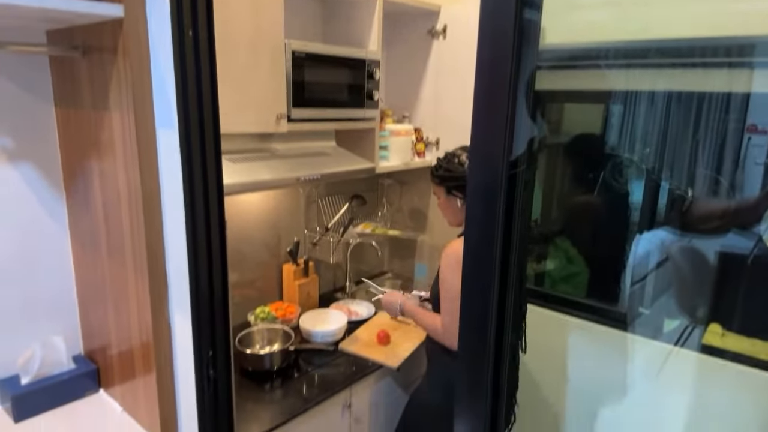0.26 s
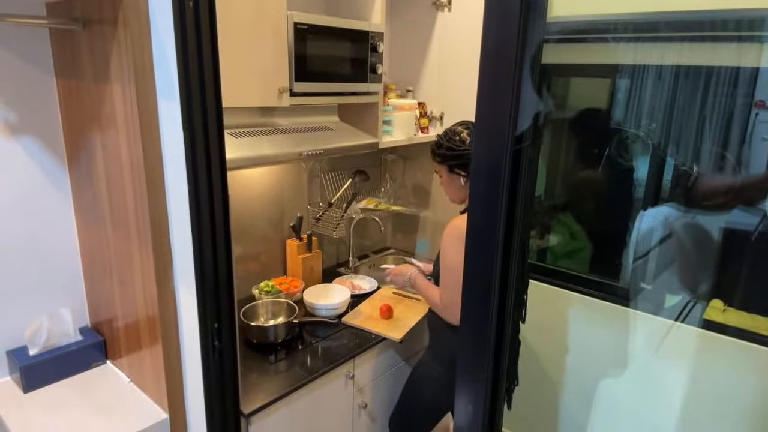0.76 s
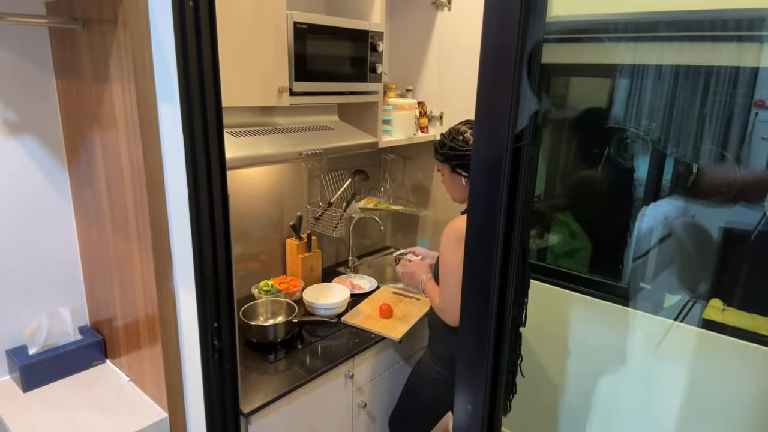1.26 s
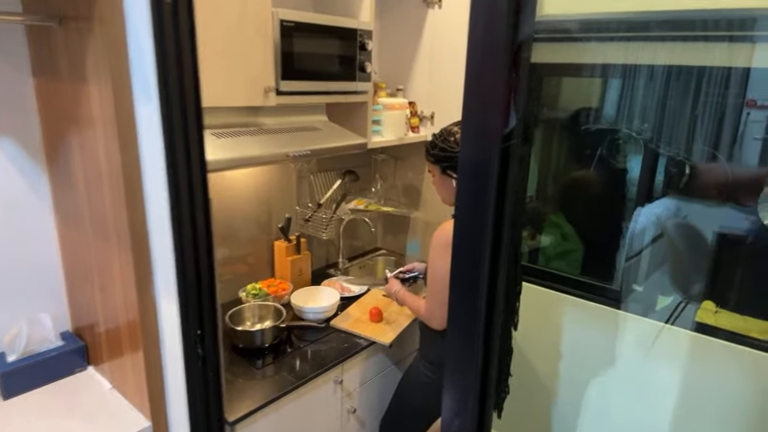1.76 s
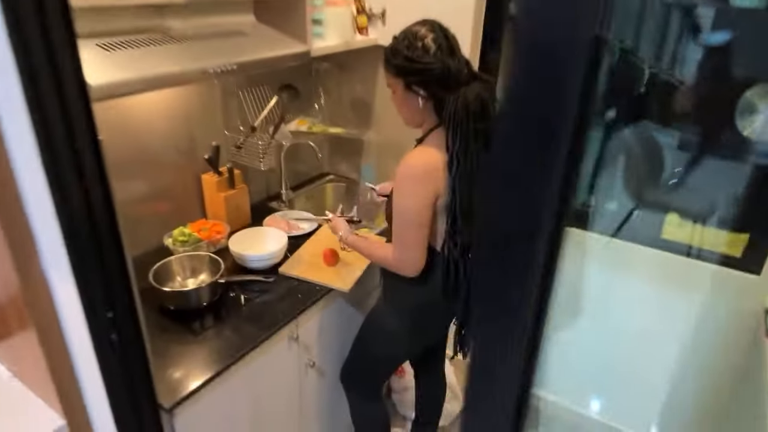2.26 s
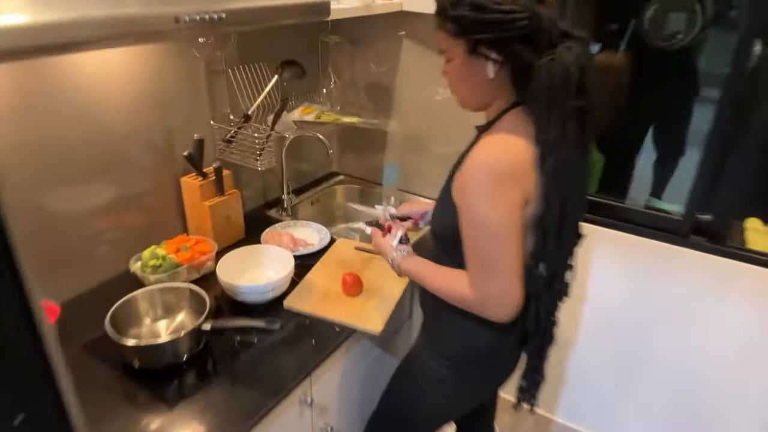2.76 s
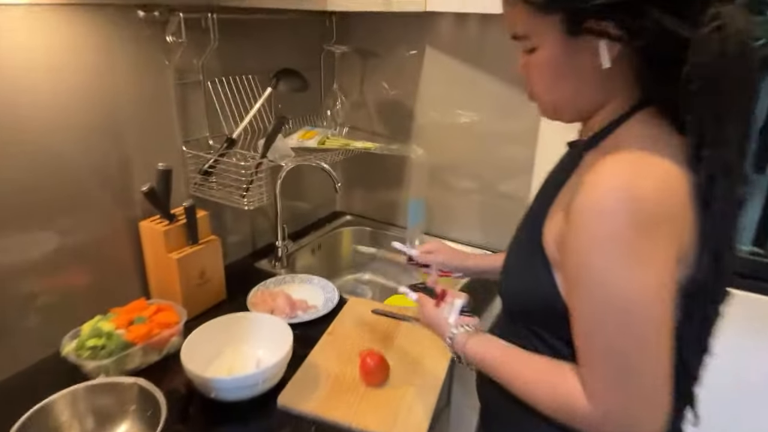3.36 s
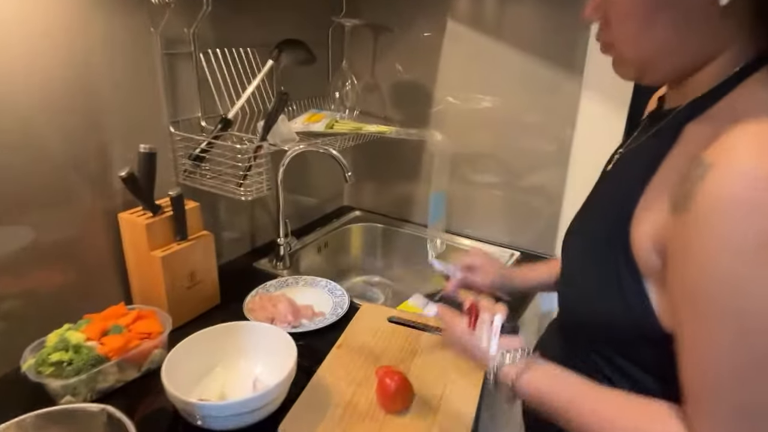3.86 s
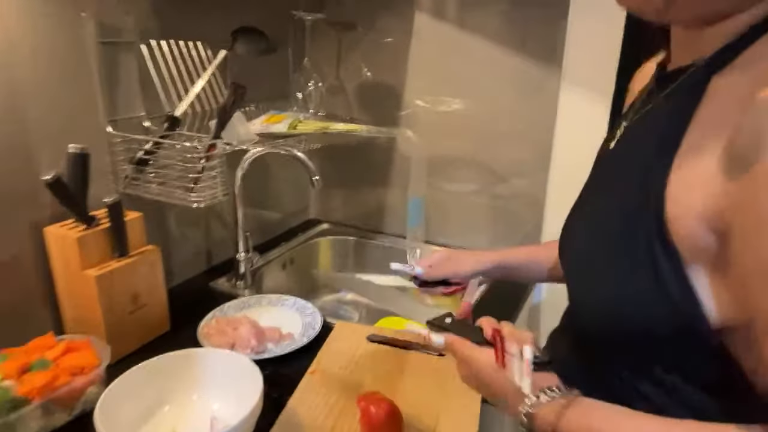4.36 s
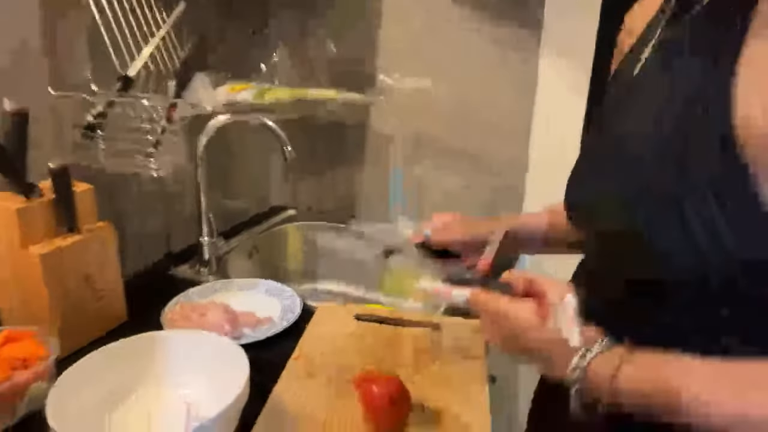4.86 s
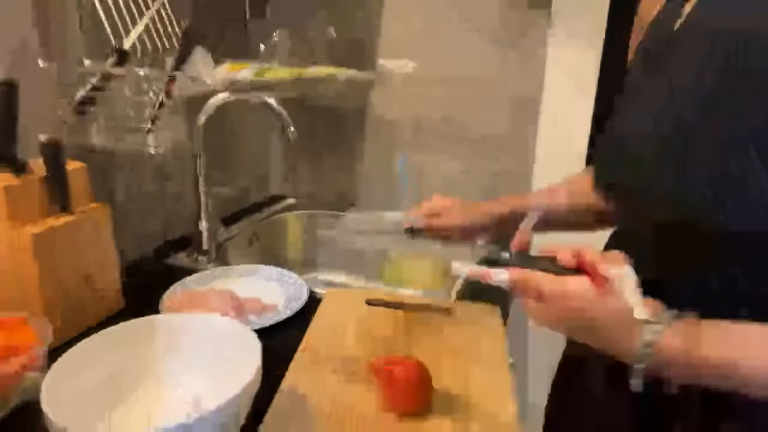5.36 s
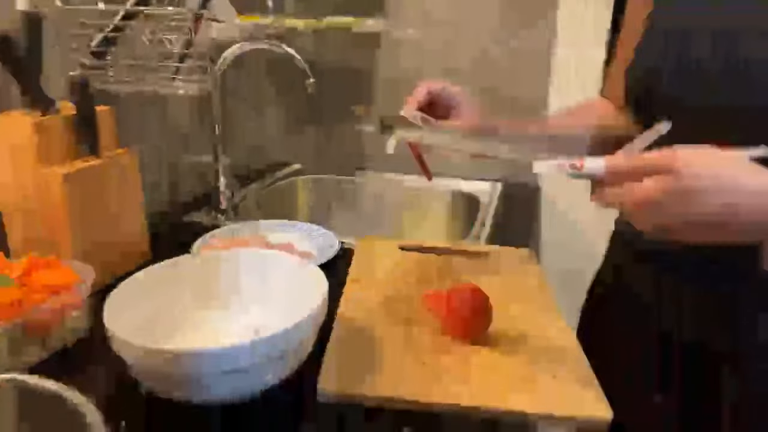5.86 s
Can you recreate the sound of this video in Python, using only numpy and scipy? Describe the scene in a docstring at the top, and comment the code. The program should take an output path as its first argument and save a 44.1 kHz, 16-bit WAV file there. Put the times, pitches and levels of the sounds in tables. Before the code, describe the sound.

Bright, gritty knife scrapes, mostly creeping and then tearing quickly, ring lightly in a small echoing kitchen. A low airy fan hums behind. After two early strokes there is a pause with small steel ticks, then irregular pulls that get louder, drier and closer. Around the middle the whole sound dips out three times. Near the end come strong scrapes, a hard plastic rattle, finger rustle and a last squeaky pull.

```python
"""Sharpening a kitchen knife

A steel knife is drawn again and again through a handheld sharpener in a small hard-walled kitchen.
Many pulls start with a click; the edge mostly creeps, then speeds up and tears over the abrasive.
Scrapes are random grain hits ringing through blade and holder; squeaks are gliding tones, and taps
and knocks are short noise bursts. Fingers rustle, random echoes make the room, and a fan of noise
and wavering tones hums behind. In the middle the whole sound fades down three times and returns.
"""
import sys
import numpy as np
from scipy import signal
from scipy.fft import rfft, irfft
from scipy.io import wavfile
from scipy.ndimage import map_coordinates

SR = 44100
rng = np.random.default_rng(int(sys.argv[2]) if len(sys.argv) > 2 else 0)


def wrap_up_sound(samples):
    """Save the sound to the file named by the first command line argument, as 16-bit audio."""
    columns = np.atleast_2d(samples).T
    # keep every value between -1 and 1, then stretch to whole-number steps
    tamed = np.clip(columns, -1, 1)
    steps = np.round(tamed * 32767).astype(np.int16)
    wavfile.write(sys.argv[1], SR, steps)


N = 270137
TIME = np.arange(N) / SR

# pulls of the blade: start_s, seating_s, speeding_up_s, full_speed_s, level_db, rub_while_seating_db,
# easing_db_per_s, treble_against_rest_db (before the speed effect), holder_against_scrape_db
PULLS = [(.138, 0.013, 0.027, 0.057, -32, -7, 2, -1, -32.5),
         (.478, 0.022, .028, 0.062, -30, -14.5, 11, -2, -35),
         (1.077, 0.0017, 0.0042, .085, -55.5, 3, 84, -1, -18.5),
         (2.613, 0.063, 0.084, 0.0053, -26.5, -16, 51, -1, -24),
         (3.004, 0.032, .1, 0.046, -33, -14, 32, 3, -24.5),
         (3.788, 0.0051, 0.024, 0.062, -41.5, -8.5, 50, -0.5, -22.5),
         (4.019, 0.0054, 0.018, .018, -46.5, -12, 51, 0.5, -17),
         (4.235, 0.048, 0.013, .005, -36, -9, 50, -3.5, -19),
         (4.405, 0.0038, 0.026, 0.083, -30.5, -4.5, 46, 3, -20),
         (4.686, 0.063, 0.025, 0.06, -23, -21.5, 95, 4.5, -53),
         (5.096, 0.035, 0.036, 0.03, -24, -5.5, 86.5, 4, -23),
         (5.571, 0.091, 0.1, 0.013, -26.5, -35, 58.5, 0.5, -23)]
# the edge catches and sings: start_s, end_s, first_hz, last_hz, level_db
SQUEAK_GLIDES = [(0.138, 0.14, 2404, 2450, -46.5), (0.166, 0.2, 2376, 2436, -52),
                 (.476, 0.502, 2600, 2440, -33), (2.722, 2.77, 2520, 2873, -43.5),
                 (3.071, 3.094, 2394, 2400, -46.5), (3.112, 3.129, 6230, 6130, -38),
                 (4.755, 4.781, 2320, 2410, -40.5), (5.704, 5.777, 2576, 2986, -39),
                 (5.788, 5.808, 5520, 5440, -40)]
# steel taps the sharpener: start_s, level_db (before the shared trim), treble_against_rest_db, main_ring_hz
STEEL_TAPS = [(.139, -37, 3.5, 2680), (.479, -31, -9, 2860), (0.482, -44, -7, 2520),
              (.782, -53.5, 10, 5030), (1.189, -48, -4, 5030), (1.455, -59.5, 0, 6260),
              (1.542, -49, -9, 3550), (1.677, -53, -9, 3600), (1.784, -57, 7, 12000),
              (1.977, -62, -26, 3700), (2.299, -54, -8, 5250), (2.404, -49, 5, 5400), (2.614, -31, 0, 3590),
              (3.003, -28, 4, 6280), (4.234, -35, -2.5, 3880), (4.686, -36.5, 5, 5630),
              (4.94, -53, -12, 4140), (5.095, -27, 0, 4780), (5.421, -57.5, -12, 2130),
              (5.495, -55, 1, 3870), (5.57, -38.5, -3, 3700)]
# blows on the plastic holder: start_s, level_db (before push strength and trim), contact_s, dull_above_hz
HOLDER_KNOCKS = [(2.616, -47.5, 0.13, 2560), (4.14, -49, 0.05, 490), (4.212, -53.5, 0.11, 1530),
                 (5.151, -26, 0.02, 3970), (5.168, -30.5, 0.021, 3500), (5.446, -40.5, 0.02, 1510),
                 (5.471, -38.5, 0.017, 450)]
# blade resonances: pitch_hz, width_hz, level_db
BLADE_MODES = [(2456, 230, 0), (2990, 310, -7), (3660, 620, 3), (4670, 440, 1), (5100, 850, -3),
               (6000, 260, 0), (8430, 300, -6), (11500, 690, 3.5), (12700, 350, 2.5)]
# holder resonances: pitch_hz, width_hz, level_db
HOLDER_MODES = [(235, 50, -1.5), (290, 60, -2.5), (656, 27, -13), (740, 54, -14.5), (1020, 320, -10.5),
                (1180, 1100, 3.5), (1450, 100, -9), (1820, 220, 6), (2250, 160, -12)]
# colour of the grinding edge: pitch_hz, relative_level_db
GRIT_COLOUR = [(150, -39), (700, -24), (2000, -10.5), (2450, -17), (4000, -1.5), (5400, -1.5), (7200, -5.5),
               (8600, 0.5), (12000, -1), (15600, 2.5)]
# colour of a tap, also used for the rustle of handling: pitch_hz, relative_level_db
TAP_COLOUR = [(150, -17), (600, -9), (1900, -5.5), (2500, 0.5), (5500, -7), (7300, -12), (9000, -7.5),
              (15600, -11.5)]
# colour of a knock: pitch_hz, relative_level_db
KNOCK_COLOUR = [(30, -43.5), (70, -15.5), (140, -9), (260, 1.5), (480, -3), (1100, 5), (2200, -6),
                (4000, -6), (12000, -28)]
# fingers shift on the handles: start_s, length_s, level_db
FINGER_SHIFTS = [(0, 0.019, -60), (1.093, .4, -66), (2.391, 0.33, -66.5), (4.085, 0.97, -60),
                 (5.439, 0.33, -55.5)]
# colour of the fan's rushing air: pitch_hz, relative_level_db
AIR_COLOUR = [(25, -45.5), (48, -22.5), (72, -0.5), (130, 0), (210, 4.5), (400, -2), (800, -6.5),
              (1400, -12.5), (2300, -24.5), (3100, -25.5), (4500, -30.5), (8000, -35.5), (15500, -39.5)]
# fan level over time: time_s, level_db
FAN_LEVEL = [(0, -53.5), (2.2, -53), (2.7, -51), (3.2, -56), (5.4, -54.5), (6.1, -56)]
# fan tones: pitch_hz, level_db (before the shared trim and the changes in fan level)
FAN_TONES = [(194, -63.5), (388, -67), (437, -65), (2990, -76)]
# the whole sound fades down and comes back: fade_start_s, return_start_s
FADES = [(3.168, 3.825), (3.867, 4.048), (4.298, 4.405)]

FADE_DB_PER_S, RETURN_S = 332.5, 0.015
ROOM_T60_LOW_S, ROOM_T60_HIGH_S = 0.33, 0.24  # time for echoes to drop by 60 dB
TOP_HZ = 15750
GRIP_SPREAD_DB = 1.7  # scales the flutter of the friction within a pull
TREBLE_PER_DB = 0.56  # a faster edge is brighter: dB of treble tilt per dB of speed
LEAVE_DB_PER_S = 650  # how fast the scrape dies as the edge leaves the slot
# each finger shift swells and dies away; a still grip barely rustles
SHIFT_ATTACK_S, SHIFT_RELEASE_S, STILL_GRIP_DB = 0.018, 0.072, -73


def stroke(seat_s, rise_s, hold_s, db, rub_db, ease_db_per_s, bright_db, holder_db,
           grains_per_s=11000, spread_db=3, grip_hz=260, ring_db=-6, size=16384):
    """The edge breaks over thousands of abrasive grains; uneven grip varies their force."""
    speed_db = edge_speed(np.arange(size) / SR, seat_s, rise_s, hold_s, rub_db, ease_db_per_s)
    hit = rng.random(size) < grains_per_s / SR
    strength_db = spread_db * np.minimum(rng.exponential(size=size), 4)
    grains = hit * rng.choice([-1, 1], size) * undb(strength_db)
    grains = grains * undb(GRIP_SPREAD_DB * walk(grip_hz, size))

    # the clamp point travels along the blade, so its resonances slide during the pull
    shift, slide = rng.standard_normal(2)
    playback_rate = 1 + .012 * shift + .03 * slide * np.linspace(-1, 1, size)
    blade = map_coordinates(steel(grains), [np.cumsum(playback_rate)], order=3)

    scrape = unit(unit(colour(grains, GRIT_COLOUR)) + undb(ring_db) * unit(blade))
    scrape = brighten(scrape, bright_db + TREBLE_PER_DB * speed_db)
    holder = unit(ring(grains, HOLDER_MODES)) * undb(holder_db)
    return (scrape + holder) * undb(db + speed_db)


def edge_speed(t, seat_s, rise_s, hold_s, rub_db, ease_db_per_s):
    """Speed in dB: the blade rubs while it seats, moves smoothly to full speed, eases and leaves."""
    rise = np.sin(np.pi / 2 * np.clip((t - seat_s) / rise_s, 0, 1)) ** 2
    at_speed_s = np.maximum(t - seat_s - rise_s, 0)
    leaving_s = np.maximum(at_speed_s - hold_s, 0)
    slowing_db = ease_db_per_s * at_speed_s + LEAVE_DB_PER_S * leaving_s
    return 20 * np.log10(rise + (1 - rise) * undb(rub_db)) - slowing_db


def steel(x, lowest_hz=2100):
    """The narrow blade rings, but radiates almost nothing below its first resonance."""
    highpass = signal.butter(4, lowest_hz, "high", fs=SR, output="sos")
    return signal.sosfilt(highpass, ring(x, BLADE_MODES))


def squeak(start, end, first_hz, last_hz, db, size=8192):
    """Stick and slip lock on to one blade resonance, which glides as the contact point moves."""
    n = int(np.clip(end - start, .01, .15) * SR)
    hz = np.linspace(first_hz, last_hz, n) + 110 * walk(900, size)[:n]
    tone = np.sin(2 * np.pi * np.cumsum(hz) / SR)
    return undb(db) * unit(tone * signal.windows.tukey(n, .5))


def tap(db, bright_db, hz, contact_s=0.0047, ring_db=-8, main_db=-6, main_width_hz=900,
        gain_db=-9, size=4096):
    """A hard contact that sets the blade ringing; a light touch is a shorter, drier tick."""
    firm = np.interp(db, [-48, -35], [.5, 1])
    fading = np.exp(-np.arange(size) / SR / (contact_s * firm))
    push = colour(rng.standard_normal(size) * fading, TAP_COLOUR)
    blade = firm * undb(ring_db) * unit(steel(push))
    main = undb(main_db) * unit(ring(push, [(hz, main_width_hz, 0)]))
    return unit(brighten(unit(push) + blade + main, bright_db)) * undb(db + gain_db)


def knock(db, contact_s, dull_hz, ring_db=-3, gain_db=2, size=8192):
    """A blow on the hollow holder: noise dies over the contact time, and a filter dulls the top."""
    push = rng.standard_normal(size) * np.exp(-np.arange(size) / SR / contact_s)
    x = unit(colour(push, KNOCK_COLOUR)) + undb(ring_db) * unit(ring(push, HOLDER_MODES))
    x = signal.lfilter(*signal.butter(2, dull_hz, fs=SR), x)
    return unit(x) * np.std(push) * undb(db + gain_db)  # a longer push carries more energy


def handling(rough_db=3, bright_db=-8):
    """Faint uneven rubbing of fingers and steel on plastic, stronger when the grip shifts."""
    rub = rng.standard_normal(N) * undb(rough_db * walk(45, N))
    pressure = undb(STILL_GRIP_DB)
    for start_s, length_s, db in FINGER_SHIFTS:
        swell = np.clip((TIME - start_s) / SHIFT_ATTACK_S, 0, 1)
        release = np.exp(-np.maximum(TIME - start_s - length_s, 0) / SHIFT_RELEASE_S)
        pressure = np.maximum(pressure, undb(db) * swell * release)
    return unit(brighten(colour(rub, TAP_COLOUR), bright_db)) * pressure


def kitchen(x, size=6000):
    """Hands and microphone keep moving, so each short stretch meets a new pattern of echoes."""
    out, window = np.zeros(N), signal.windows.cosine(size)
    for i in range(0, N - size, size // 2):  # stretches overlap by half
        add(out, i / SR, signal.fftconvolve(x[i:i + size] * window, echoes()))
    return out


def echoes(first_echo_s=0.0013, build_s=0.0028, split_hz=5000, size=24000):
    """Dense echoes from steel and tile, with their own decay for lows and treble."""
    t = np.arange(size) / SR
    noise = rng.standard_normal(size)
    low = signal.sosfiltfilt(signal.butter(1, split_hz, fs=SR, output="sos"), noise)
    low_tail = low * undb(-60 * t / ROOM_T60_LOW_S)
    high_tail = (noise - low) * undb(-60 * t / ROOM_T60_HIGH_S)
    tail = (low_tail + high_tail) * np.clip((t - first_echo_s) / build_s, 0, 1)
    return tail / np.linalg.norm(tail)


def fan(waver_db=4, drift_hz=4, hum_db=-1):
    """Low rushing air (filtered noise) with a few motor tones that waver in pitch and level."""
    air = unit(colour(rng.standard_normal(N), AIR_COLOUR))
    hum = 0
    for hz, db in FAN_TONES:
        # higher tones are more smeared by the turbulent air
        drift = drift_hz * np.sqrt(hz / FAN_TONES[0][0]) * walk(hz / 10, N)
        phase = 2 * np.pi * np.cumsum(hz + drift) / SR
        tone = unit(np.sin(phase) * undb(waver_db * walk(7.8, N)))
        hum = hum + undb(db + hum_db) * tone
    gain = undb(curve(FAN_LEVEL, TIME)[0])
    return gain * (air + hum / gain.mean())


def undb(db):
    """Turn decibels into gain."""
    return 10 ** (np.asarray(db) / 20)


def unit(x):
    """Scale to an average (rms) strength of 1."""
    return x / np.sqrt(np.mean(x ** 2) + 1e-20)


def curve(rows, t):
    """Join each column of a table by straight lines in time."""
    s, *columns = np.transpose(rows)
    return [np.interp(t, np.sort(s), c) for c in columns]


def add(out, s, x):
    """Mix x into out from time s, in seconds."""
    i = max(int(s * SR), 0)
    out[i:i + len(x)] += x[:len(out) - i]


def walk(rate, n):
    """Random wander: rate random points per second, joined by straight lines."""
    return np.interp(np.arange(n) * rate / SR, np.arange(n), rng.standard_normal(n))


def colour(x, points, size=4096):
    """Filter to the given (Hz, dB) outline, without sounding ahead of the input."""
    hz, db = np.transpose(points)
    f = np.maximum(np.arange(size // 2 + 1) * SR / size, 1)
    outline_db = np.interp(np.log(f), np.log(hz), db)
    # folding the cepstrum packs the filter's energy towards its start (minimum phase)
    cepstrum = irfft(np.log(undb(outline_db)))
    cepstrum[1:size // 2] *= 2
    cepstrum[size // 2 + 1:] = 0
    return signal.fftconvolve(x, irfft(np.exp(rfft(cepstrum))))[:len(x)]


def ring(x, modes):
    """Add up resonances, each a narrow filter with pitch in Hz, width in Hz and level in dB."""
    out = 0
    for hz, width, db in modes:
        peak = signal.iirpeak(min(hz, SR / 2 - 1000), hz / width, SR)
        out = out + undb(db) * signal.lfilter(*peak, x)
    return out


def brighten(x, db, split_hz=7000):
    """Tip the balance between the treble and everything below it."""
    mids = signal.sosfiltfilt(signal.butter(2, split_hz, fs=SR, output="sos"), x)
    return mids * undb(-db / 2) + (x - mids) * undb(db / 2)


def scene(far_direct_db=-5, near_direct_db=0.0, room_db=-3):
    """Knife and sharpener in the kitchen, heard first from the doorway and then from close by."""
    knife = np.zeros(N)
    for start_s, *pull in PULLS:
        add(knife, start_s, stroke(*pull))
    for row in SQUEAK_GLIDES:
        add(knife, row[0], squeak(*row))
    for start_s, *blow in STEEL_TAPS:
        add(knife, start_s, tap(*blow))
    for start_s, *blow in HOLDER_KNOCKS:
        add(knife, start_s, knock(*blow))
    # coming closer raises the direct sound, while the echo level stays put
    direct_db = np.interp(TIME, [2, 4.5], [far_direct_db, near_direct_db])
    direct = knife * undb(direct_db)
    room = undb(room_db) * kitchen(knife)
    return (direct + room + handling() + fan())[None]


def record(dry):
    """The sound fades down three times and returns quickly; a steep filter cuts the top."""
    gain = np.ones(N)
    for start_s, back_s in FADES:
        fading = undb(-FADE_DB_PER_S * np.clip(TIME - start_s, 0, 1))
        returning = np.clip((TIME - back_s) / RETURN_S, 0, 1)
        gain = gain * np.maximum(fading, returning)
    lowpass = signal.ellip(10, .2, 80, TOP_HZ, fs=SR, output="sos")
    return signal.sosfilt(lowpass, dry * gain)


dry = scene()
out = record(dry)
wrap_up_sound(out)
```